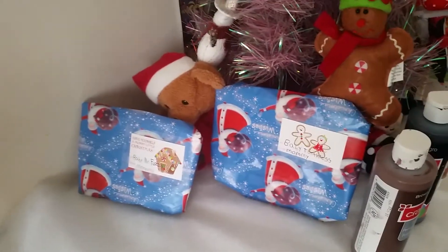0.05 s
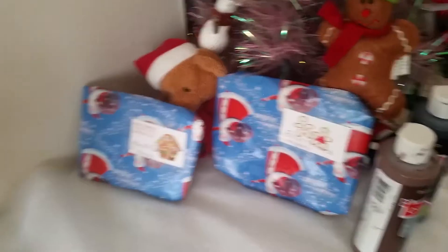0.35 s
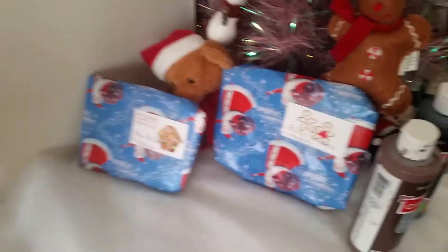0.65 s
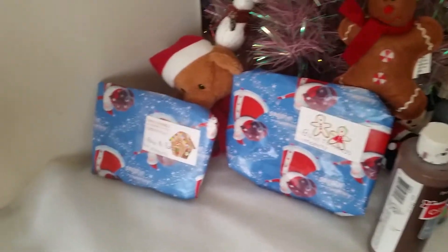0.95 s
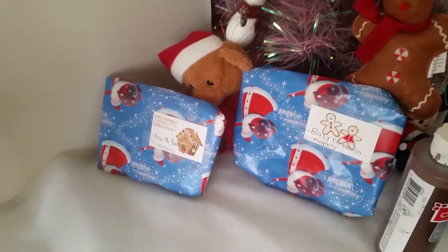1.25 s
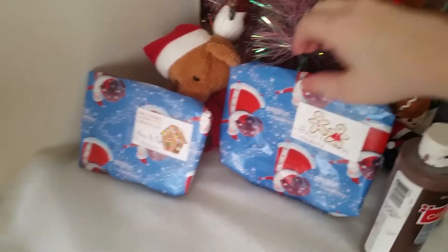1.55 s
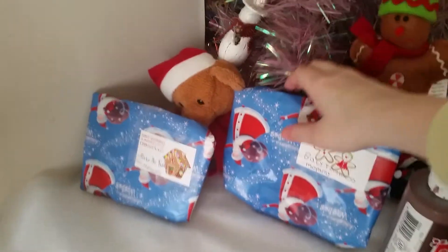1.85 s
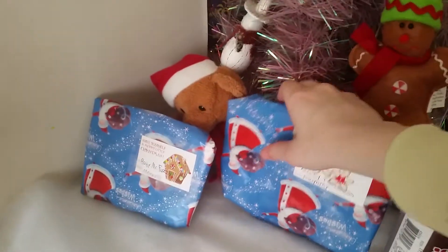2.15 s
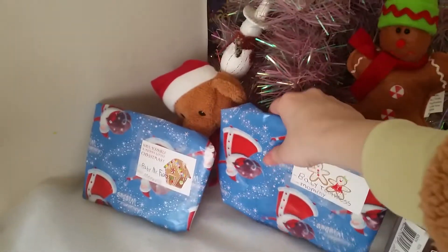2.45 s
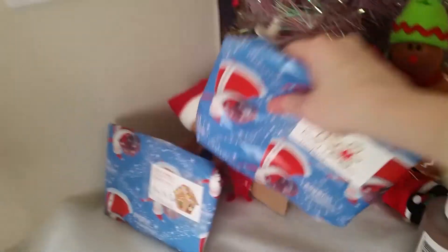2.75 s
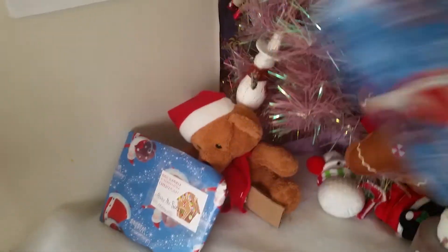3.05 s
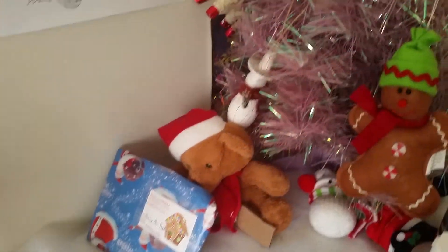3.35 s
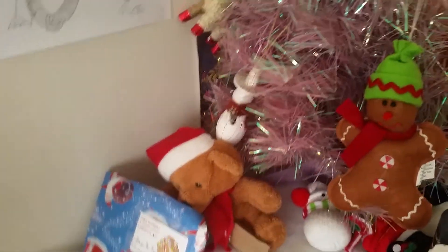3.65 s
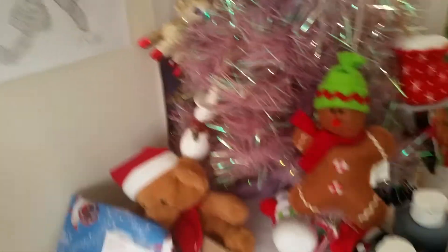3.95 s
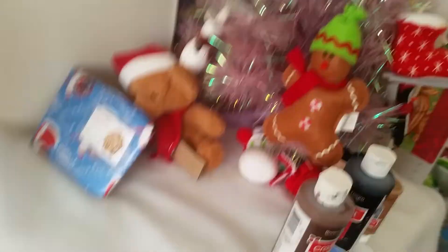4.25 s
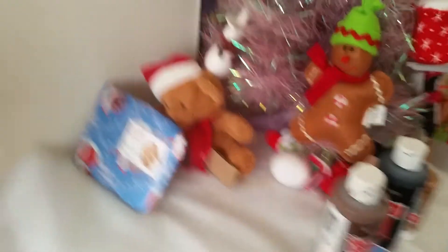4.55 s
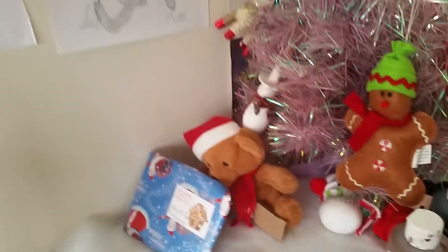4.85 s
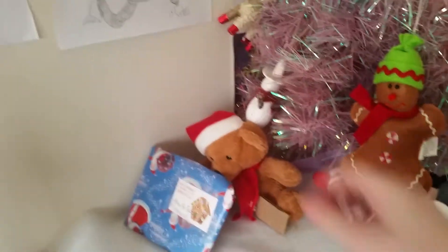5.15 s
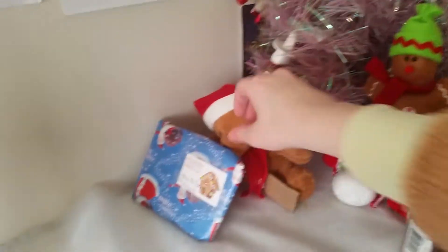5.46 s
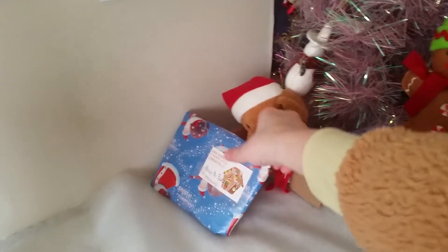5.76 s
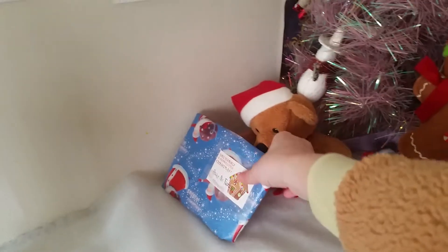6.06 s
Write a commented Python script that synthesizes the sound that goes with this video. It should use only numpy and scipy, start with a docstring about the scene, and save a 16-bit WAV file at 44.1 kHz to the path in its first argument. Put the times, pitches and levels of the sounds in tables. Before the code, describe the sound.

Glossy wrapping paper crinkles and snaps close by as a gift is handled, with soft bumps on the microphone.

```python
"""Gift-wrapped parcel and tinsel, close up.

A soft parcel in glossy wrap is gripped, lifted from a heap of tinsel and set down by a hand-held camera;
then a hand takes a second parcel. The paper buckles in sharp snaps over a rustle of tiny creases.
Fingers knock and drag on the camera body. Its two microphone ports colour the paper differently.
The room is small and dead, with a steady hiss."""
import sys
import numpy as np
from scipy import signal
from scipy.fft import rfft, irfft, next_fast_len
from scipy.io import wavfile
from scipy.ndimage import map_coordinates

SR = 44100
rng = np.random.default_rng(int(sys.argv[2]) if len(sys.argv) > 2 else 0)


def wrap_up_sound(samples):
    """Save the sound to the file named by the first command line argument, as 16-bit audio."""
    columns = np.atleast_2d(samples).T
    # keep every value between -1 and 1, then stretch to whole-number steps
    tamed = np.clip(columns, -1, 1)
    steps = np.round(tamed * 32767).astype(np.int16)
    wavfile.write(sys.argv[1], SR, steps)


N = 277459

# hand moves that flex and slide the paper:
# (time [s], hold [s], crackle level [dB], body offset [dB], fizz offset [dB])
HAND_STROKES = [ (1.966, 0.0067, -43, -2.5, 1), (2.032, 0.046, -55.5, -1.5, 0.5),
                (2.15, 0.051, -55.5, 4, 0.5), (2.32, 0.05, -63.5, 5.5, 1), (2.526, 0.034, -42.5, 6, -4.5),
                (2.668, 0.022, -36.5, 1.5, -2.5), (2.704, 0.052, -39.5, -24, -4.5),
                (2.942, 0.0079, -44, -11, -6.5), (3.02, 0.13, -52.5, 0, -2.5),
                (3.235, 0.021, -51.5, -10, -0.5), (3.373, 0.17, -52, -4, -1), (3.63, 0.084, -53.5, -10, -6),
                (3.765, 0.021, -41, 1, 3.5), (3.885, 0.036, -25, -1.5, -1.5), (3.969, .11, -41, 1, -6),
                (4.138, 0.011, -36, -4, -2), (4.215, 0.16, -36.5, 4.5, -4), (4.272, .05, -32.5, 3, -25),
                (4.416, 0.1, -41, 2, 1), (4.562, 0.023, -43, 6.5, -8.5), (4.66, 0.25, -57.5, -4, -3),
                (5.753, 0.037, -50, -3.5, 1.5), (5.897, 0.23, -57, -2, -2.5), (6.027, 0.064, -54, 3, -7),
                (6.257, 0.026, -47.5, -7, -1.5)]
# parcel position: (time [s], nearness [0 arm's length .. 1 close], treble left-right [dB])
PARCEL_PATH = [(0, 0, -4), (2.7, 0.079, 1.5), (3.0, 0.32, -1), (3.13, 0.22, -10.5), (3.55, 0.29, -10.5),
               (3.72, 0.73, -6.5), (3.92, 0.79, -3), (4.3, 0.6, -0.5), (4.6, 0.69, 6), (4.85, 0.58, -3.5),
               (5.75, 0.16, 1.5), (6.29, 0.24, -1.5)]
STROKE_ATTACK_S, STROKE_RELEASE_S = 0.072, 0.046


def paper():
    """Snaps and rustle reach the two ports alike in the bass, nearly unrelated in the treble."""
    # registers of the sheet, broad panels to sharp crease tips: (frequency [Hz], level [dB])
    body_colour = [(40, -16), (150, -6), (280, 0.5), (450, -2), (650, -2), (1100, -0.5), (1700, -4),
                   (3000, -30)]
    crack_colour = [(500, -25), (1000, -12.5), (1500, -5.5), (4450, -1), (4900, -7), (6000, -8.5),
                    (9000, -32.5)]
    edge_colour = [(3500, -51.5), (5500, -3), (7000, 0.5), (16000, 5.5)]
    body, crack, edge = [a + b for a, b in zip(snaps(), rustle())]
    return (through_ports(body, body_colour, correlation=0.81)
            + through_ports(crack, crack_colour, correlation=0.12)
            + through_ports(edge, edge_colour, correlation=0.065))


def snaps():
    """Buckling creases drive the body, crack and edge registers, each with its own strength."""
    # (time [s], level [dB], body offset [dB], edge offset [dB], edge left-right [dB], ring [Hz])
    big_snaps = [(2.4898, -42, -6, -29, 6, 2260), (2.511, -28, -1, 0.5, 6, 2310),
                 (2.5225, -24.5, -16, -9.5, 8, 2230), (2.5271, -25.5, -19, -11, 11, 2170),
                 (2.544, -32, -4, -8, 6, 2300), (2.607, -39, -7, -7, -1, 2410),
                 (2.6511, -34, -2.5, -1, 5, 3920), (2.6743, -37, -23, -3, -1, 3970),
                 (2.6859, -29.5, 5, 4.5, -3, 2300), (2.6879, -33.5, 1.5, -14, -3, 2370),
                 (2.7512, -34.5, -7, -17, 5, 2560), (2.7719, -34.5, -8, 1, 4, 2500),
                 (2.9088, -40, -1, -26, 17, 2080), (2.934, -34, -19, -9, 5, 2370),
                 (2.9809, -40.5, -4.5, -12.5, 4, 2280), (3.0595, -33.5, -17, -5, -2, 2500),
                 (3.0695, -37.5, 0, -2, -5, 2300), (3.082, -31.5, -3.5, -5.5, 0, 2490),
                 (3.179, -38.5, -5.5, -4, -5, 1950), (3.251, -40, -10.5, -22, -17, 2320),
                 (3.3124, -39, -6.5, -19, -5, 1980), (3.3206, -39, -9, -6, -7.5, 2150),
                 (3.3402, -31.5, -6.5, 7, -7, 2100), (3.639, -44.5, -6, -15, 1, 1430),
                 (3.667, -37, -11, -3, 6, 3000), (3.687, -41, 5.5, -14, -6, 2000),
                 (3.7297, -35.5, 0, -0.5, 15, 2980), (3.8491, -30, -1.5, -8, 0, 1520),
                 (3.862, -30.5, 0.5, -1, 12, 2980), (3.9040, -28, 3.5, 8, -1, 1120),
                 (3.9182, -31.5, 1, 4, 10, 4060), (3.9240, -29.5, 3, 12, -11, 3970),
                 (3.949, -32, 3, -6, -13, 3070), (4.0138, -30, 9.5, -2.5, -1.5, 1250),
                 (4.043, -32.5, -10, -4, -3, 1490), (4.102, -32, 2.5, 6, -3.5, 3140),
                 (4.1166, -23, 4, -2.5, -5, 3140), (4.176, -36, 0.5, -8.5, 10, 452),
                 (4.204, -31, 6, -10, -6, 2170), (4.2704, -34.5, -0.5, 9.5, 15.5, 547),
                 (4.2899, -30, -2, -1.5, 15, 2280), (4.317, -45, -5, 14.5, -3, 2270),
                 (4.329, -29, -17, 2.5, -2, 2260), (4.374, -34, -12.5, -2.5, 11, 2110),
                 (4.403, -34, -16.5, 4.5, 7.5, 3100), (4.436, -29, -3, -7, 13, 2000),
                 (4.47, -35, -3, -4.5, 13, 4090), (4.5024, -38, -10, 4, 15.5, 4220),
                 (4.5514, -21, -4, -11, 11, 2180), (4.5601, -23.5, -4, -8.5, 1.5, 2270),
                 (4.5857, -30, -2, -15.5, 1, 1700), (4.6976, -38, -6.5, -22, 17, 2060),
                 (4.7256, -37.5, -6, -8.5, 1, 3120), (4.7509, -29.5, 0, -6, 8, 547),
                 (4.776, -40, -5, -1, 2, 1060), (4.801, -40.5, -4.5, -0.5, 15, 1300),
                 (4.848, -46.5, 0.5, -3, 2, 4030), (4.871, -51.5, 3.5, -15, 5.5, 1520),
                 (5.0377, -32.5, -3.5, -12, 4, 1620), (5.636, -38.5, 3, 3, 6, 3150),
                 (5.719, -44, 1, -13, 2, 3030), (6.0833, -39, 0, -4.5, 7, 4200),
                 (6.2333, -26, -7, 0.5, 3.5, 2680)]
    body, crack, edge = np.zeros((3, 2, N))
    for s, db, body_db, edge_db, pan_db, hz in big_snaps + small_snaps():
        strength = rng.choice([-1, 1]) * amp(db)
        push = buckle(pop=0.8, t60_s=0.032, flutter_db=-15.5, flutter_t60_s=0.034)
        snap = buckle(pop=0.43, t60_s=0.026, flutter_db=-33, flutter_t60_s=0.24)
        tick = buckle(pop=0.45, t60_s=0.011, flutter_db=-10.5, flutter_t60_s=0.052)
        add(body, s, strength * amp(body_db - 5.5) * ring(push, hz, q=1.4, boost=0.75))
        add(crack, s, strength * amp(-4) * ring(snap, hz, q=7, boost=1.9))
        add(edge, s, strength * amp(edge_db) * panned(pan_db) * tick)
    return body, crack, edge


def small_snaps():
    """Lesser creases give way at random, as hard as the paper is flexed. Rows as in big_snaps."""
    slots_per_s, scatter_db, far_db, floor_db = 32, 3, -5, -70
    ring_hz, spread_octaves = 2210, 0.29
    flex = swells([stroke[:3] for stroke in HAND_STROKES], STROKE_ATTACK_S, STROKE_RELEASE_S)
    near, pan_db = curves(PARCEL_PATH)
    draws = rng.standard_normal((int(slots_per_s * N / SR), 6))
    rows = []
    for slot, (jitter, size, body, edge, side, pitch) in enumerate(draws):
        s = (slot + 0.5 + 0.5 * np.tanh(jitter)) / slots_per_s
        i = min(int(s * SR), N - 1)
        db = 20 * np.log10(flex[i]) + 1.5 + far_db * (1 - near[i]) + scatter_db * np.tanh(size)
        if db > floor_db:
            body_db, edge_db = scatter_db * body - 3.5, scatter_db * edge - 0.5
            hz = ring_hz * 2 ** (spread_octaves * pitch)
            rows.append((s, db, body_db, edge_db, pan_db[i] + 0.5 * side, hz))
    return rows


def buckle(pop, t60_s, flutter_db, flutter_t60_s):
    """A crease pops over, shivers in fast uneven jerks, then flutters weakly. Rms 1 over the first 5 ms."""
    jerks_per_s, rise_s = 1500, 0.00025
    t = np.arange(SR // 10) / SR
    jerks = amp(4.5 * np.interp(t * jerks_per_s, np.arange(151), rng.standard_normal(151)))
    fade = amp(-60 * t / t60_s) + amp(flutter_db - 60 * t / flutter_t60_s)
    shiver = rng.standard_normal((2, len(t))) * jerks * fade * (1 - np.exp(-t / rise_s))
    shiver /= np.linalg.norm(shiver, axis=1, keepdims=True)
    shiver[:, int(rng.random() * SR / jerks_per_s)] += pop
    return shiver / np.sqrt(np.mean(shiver[:, :SR // 200] ** 2))


def rustle():
    """At arm's length the paper mostly slides; pressed close by, creases crackle and broad panels pop."""
    s, hold_s, db, body_db, fizz_db = np.transpose(HAND_STROKES)
    flex, heave, brush = [swells(zip(s, hold_s, db + offset_db), STROKE_ATTACK_S, STROKE_RELEASE_S)
                          for offset_db in (0, body_db, fizz_db)]
    near, pan_db = curves(PARCEL_PATH)
    flex_db = np.clip(20 * np.log10(flex), -70, -25)
    creases_per_s = 250 * amp(0.2 * (flex_db + 50))
    grain = creases(creases_per_s, spread_db=4, t60_s=0.008, slide=0.35 + 2.2 * (1 - near))
    body, crackle, fizz = grain * rng.standard_normal((3, 2, N))
    taut_wrap = ring(crackle, hz=2340, q=11.6, boost=0.77)  # rings under sliding fingers
    crackle = near * crackle + (1 - near) * taut_wrap
    pops = panels(per_s=210, pitch_hz=573, log_spread=0.78, t60_cycles=6.5, range_db=9.5)
    body = 0.57 * body + 0.26 * near * pops
    return (amp(-6) * heave * body,
            amp(-3.5) * flex * panned(0.8 * pan_db) * crackle,
            amp(-1.5) * brush * panned(pan_db) * fizz)


def creases(per_s, spread_db, t60_s, slide):
    """Envelope of tiny uneven creases over smooth sliding; slide is the sliding-to-crease power ratio."""
    size = amp(spread_db * np.minimum(rng.exponential(size=N), 3.5))
    flips = (rng.random(N) < per_s / SR) * size ** 2 / per_s
    t = np.arange(SR // 30) / SR
    power = np.abs(convolve(flips, amp(-60 * t / t60_s) ** 2)[0])
    return np.sqrt((power / power.mean() + slide) / (1 + slide))


def panels(per_s, pitch_hz, log_spread, t60_cycles, range_db):
    """Panels of the sheet pop in and out, each ringing a few cycles at its own pitch. Rms 1."""
    pops = np.zeros((2, N))
    t = np.arange(SR // 40) / SR
    for when, pitch, size, lead in rng.random((int(per_s * N / SR), 4)):
        hz = pitch_hz * np.exp(log_spread * (2 * pitch - 1))
        phase = 2 * np.pi * hz * t + np.array([[0], [np.pi * lead]])
        envelope = amp(range_db * size ** 2 - 60 * hz * t / t60_cycles)
        add(pops, when * N / SR, envelope * np.sin(phase))
    return unit(pops)


def through_ports(x, register, correlation, right_lag_samples=5):
    """One register of the paper at both ports; their colour blends from far to near with the parcel."""
    # port resonances, paper at arm's length and close by: (frequency [Hz], level [dB])
    left_far = [(450, -12), (650, -8.5), (1000, -10.5), (1600, -8.5), (1900, -3.5), (2300, -2),
                (2800, -6.5), (3500, -12), (4100, -3), (5200, -15.5), (6400, -19), (7500, -6.5), (9000, -8),
                (10300, -19), (14200, -38), (15300, -11)]
    right_far = [(450, -16), (750, -12.5), (1000, -18.5), (1900, -19.5), (3200, -15.5), (4400, -28.5),
                 (5500, -31), (7800, -25.5), (9300, -19), (10500, -11.5), (11300, -3.5), (12300, -22.5),
                 (14000, -10), (15300, -19)]
    left_near = [(200, -12.5), (550, 4.5), (1100, 0), (1900, -1.5), (2300, -8.5), (2700, -11), (3200, -5.5),
                 (4100, -11), (5500, -24.5), (7300, -3.5), (9000, -6.5), (10300, -22), (14200, -30.5),
                 (15300, -20)]
    right_near = [(200, -18), (600, -3), (1300, -13), (1800, -13.5), (3400, -19), (4300, -40), (5500, -35),
                  (7800, -30.5), (9300, -23), (10400, -13.5), (11400, -5), (12600, -20), (14000, -15.5),
                  (15300, -13.5)]
    # narrow pipe tones: (frequency [Hz], Q, boost)
    left_pipe = [(2277, 38, 0.9), (4030, 20.6, 0.54), (9090, 19, 0.93)]
    right_pipe = [(3160, 5.9, 0.27), (11800, 24, 0.69)]
    at_right = correlation * x[0] + np.sqrt(1 - correlation ** 2) * x[1]
    pair = np.array([x[0], np.roll(at_right, right_lag_samples)])
    near, _ = curves(PARCEL_PATH)
    heard = np.zeros((2, N))
    for share, left, right in ((1 - near, left_far, right_far), (near, left_near, right_near)):
        ir = np.array([port(register, left, left_pipe), port(register, right, right_pipe)])
        heard += convolve(share * pair, ir / np.sqrt(np.sum(ir ** 2) / 2))
    return heard


def port(register, colour, pipe):
    """Impulse response of one microphone port to one register of the paper."""
    ir = response(register, colour)
    for hz, q, boost in pipe:
        ir = ring(ir, hz, q, boost)
    return ir


def knocks():
    """Fingers bump the camera: a thud that sags in pitch, longer when lower, and a dull casing tick."""
    # (time [s], level [dB], nominal pitch [Hz], tick offset [dB])
    bumps = [(0.053, -39, 208, -38), (0.135, -41, 196, -17), (0.148, -43.5, 336, -16.5),
             (0.191, -47.5, 223, -5), (0.218, -26.5, 323, -25.5), (0.225, -34, 130.3, -31),
             (0.528, -37.5, 96, -10.5), (0.559, -41.5, 670, -5.5), (0.57, -41.5, 121, -12),
             (0.615, -42, 553, -10.5), (0.634, -29, 260, -15), (0.673, -37, 159, -22),
             (0.685, -39, 463, -14.5), (3.598, -37.5, 72.3, -29), (4.183, -26, 386.4, -34),
             (4.24, -23, 320, -31), (4.638, -38, 148, -28), (5.511, -40, 103, -40), (5.529, -42, 170, -27),
             (6.173, -43.5, 138, -29)]
    # casing under a fingertip: (frequency [Hz], level [dB])
    casing_colour = [(100, 7), (290, 6.5), (430, 8), (610, 10), (850, 4), (1300, -3), (2500, -9.5),
                     (4500, -18.5), (9000, -32.5)]
    thuds, ticks = np.zeros(N), np.zeros((2, N))
    t = np.arange(SR // 4) / SR
    for s, db, hz, tick_db in bumps:
        cycles = np.cumsum(hz * (0.59 + 0.5 * np.exp(-t / 0.016))) / SR
        t60_s = 0.004 + 6 / hz
        envelope = (1 - np.exp(-t * hz / 1.1)) * amp(-60 * t / t60_s)
        add(thuds, s, amp(db + 7) * envelope * np.sin(2 * np.pi * cycles))
        tick = buckle(pop=0.53, t60_s=0.029, flutter_db=-33, flutter_t60_s=0.054)
        add(ticks, s, amp(db + tick_db + 1) * tick)
    casing = convolve(ticks[0] + 2.46 * ticks, response(casing_colour))
    return (thuds + casing) * amp([[1], [-1]])


def grip():
    """Skin drags on the camera body in uneven lumps as the holding hand shifts."""
    # (time [s], hold [s], level [dB])
    hand_shifts = [(.155, 0.094, -49.5), (.54, .05, -49.5), (.655, 0.017, -46), (.8, 0.062, -53.5),
                   (3.58, .04, -54), (3.7, 0.19, -54), (3.89, 0.047, -46.5), (4.2, 0.12, -44),
                   (4.4, 0.26, -49.5), (4.76, 0.23, -59.5), (5.54, .03, -56.5), (5.65, 0.47, -63.5),
                   (6.19, .1, -56.5)]
    # (frequency [Hz], density [dB])
    rumble_colour = [(20, -18.5), (60, 0), (130, 2), (280, -6.5), (450, -13.5), (1000, -21.5), (3000, -28),
                     (9000, -37)]
    drag = swells(hand_shifts, attack_s=0.098, release_s=0.17)
    friction = rng.standard_normal(N) + 1.72 * rng.standard_normal((2, N))
    rub = convolve(friction, response(rumble_colour))
    lumps = amp(1.8 * wobble(knots_per_s=45))
    return amp(-3) * drag * lumps * unit(rub) * amp([[1.5], [-1.5]])


def room(x):
    """A short tail from walls and bedding, 5 ms late, treble dying first."""
    # (frequency [Hz], t60 [s])
    decay_times = [(200, 0.91), (1000, 0.21), (4000, 0.16), (14000, 0.1)]
    hz, t, noise = signal.stft(rng.standard_normal((2, SR // 3)), SR, nperseg=256)
    decay = amp(-60 * t / along(decay_times, hz)[:, None])
    _, tail = signal.istft(noise * decay, SR, nperseg=256)
    delayed = np.pad(tail, ((0, 0), (SR // 200, 0)))
    return convolve(x, delayed / np.linalg.norm(tail[0]))


def hiss():
    """Low room tone shared by both ports, plus each port's own hiss."""
    # noise colour per channel: (frequency [Hz], level [dB])
    left_colour = [(20, -54), (60, -47), (150, -51.5), (350, -55.5), (1000, -59), (3000, -66.5),
                   (4200, -56.5), (5500, -64), (7600, -60.5), (9000, -74.5), (12000, -69), (15500, -65)]
    right_colour = [(20, -58), (60, -46), (150, -55.5), (350, -53.5), (1000, -63), (3000, -69),
                    (5000, -76.5), (8000, -78.5), (10000, -70), (11500, -64), (12600, -65.5), (15500, -69)]
    port_hiss = convolve(rng.standard_normal((2, N)), response([(150, -1.5), (600, -2.5), (2000, 0.42)]))
    room_tone = convolve(rng.standard_normal(N), response([(150, 8.5), (600, -19), (2000, -14)]))
    colours = [response(left_colour), response(right_colour)]
    return amp(0.6) * convolve(amp(-2.5) * room_tone + port_hiss, colours)


def amp(db):
    return 10 ** (np.asarray(db) / 20)


def unit(x):
    return x / np.sqrt(np.mean(x ** 2) + 1e-20)


def along(points, hz):
    """Interpolate (frequency [Hz], value) points on a log axis."""
    knots_hz, values = np.transpose(points)
    return np.interp(np.log(hz + 1), np.log(knots_hz), values)


def curves(rows):
    """One value per sample for each column after the time."""
    s, *columns = np.transpose(rows)
    return [np.interp(np.arange(N) / SR, s, column) for column in columns]


def swells(moves, attack_s, release_s):
    """Gain of (time [s], hold [s], level [dB]) moves; 20 dB per attack or release time, powers add."""
    t = np.arange(N) / SR
    power = np.zeros(N)
    for s, hold_s, db in moves:
        span = slice(*np.searchsorted(t, [s - 3 * attack_s, s + hold_s + 3 * release_s]))
        before = np.maximum((s - t[span]) / attack_s, 0)
        after = np.maximum((t[span] - s - hold_s) / release_s, 0)
        power[span] += amp(db - 20 * (before + after)) ** 2
    return np.sqrt(power)


def wobble(knots_per_s):
    """Smooth random curve."""
    knots = rng.standard_normal(int(N * knots_per_s / SR) + 4)
    return map_coordinates(knots, [np.arange(N) * knots_per_s / SR])


def panned(left_right_db):
    """Left and right gains of constant power."""
    gains = amp(np.array([[1], [-1]]) * left_right_db / 2)
    return gains / np.sqrt(np.mean(gains ** 2, axis=0))


def add(track, s, sound):
    """Mix a sound into a track at time s."""
    i = max(round(s * SR), 0)
    track[..., i:i + sound.shape[-1]] += sound[..., :max(N - i, 0)]


def ring(x, hz, q, boost):
    """x with one resonance added."""
    b, a = signal.iirpeak(hz, q, fs=SR)
    return x + boost * signal.lfilter(b, a, x)


def response(*colours, size=4096):
    """Minimum-phase impulse response of (frequency [Hz], level [dB]) colours in series."""
    hz = np.fft.rfftfreq(size, 1 / SR)
    gain = amp(sum(along(points, hz) for points in colours))
    cepstrum = irfft(np.log(gain))
    cepstrum[1:size // 2] *= 2
    cepstrum[size // 2 + 1:] = 0
    return irfft(np.exp(rfft(cepstrum)))


def convolve(x, ir):
    return signal.oaconvolve(np.atleast_2d(x), np.atleast_2d(ir), axes=1)[:, :N]


def scene():
    wrap = paper()
    return wrap + amp(-19.5) * room(wrap) + knocks() + grip() + hiss()


def record(dry):
    """The camera keeps nothing above its band limit."""
    top_hz = 15900
    size = next_fast_len(N + SR // 4)
    passband = np.fft.rfftfreq(size, 1 / SR) < top_hz
    return irfft(rfft(dry, size) * passband, size)[:, :N]


dry = scene()
out = record(dry)
wrap_up_sound(out)
```